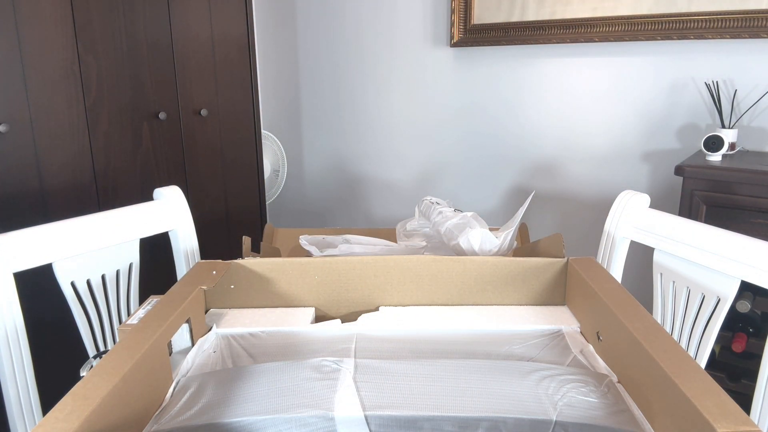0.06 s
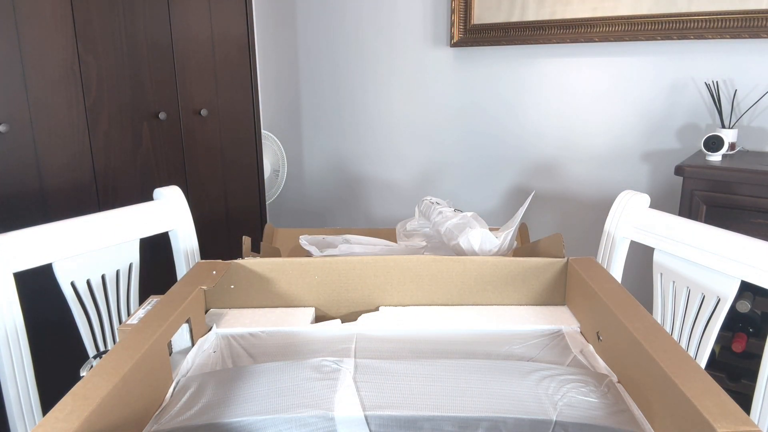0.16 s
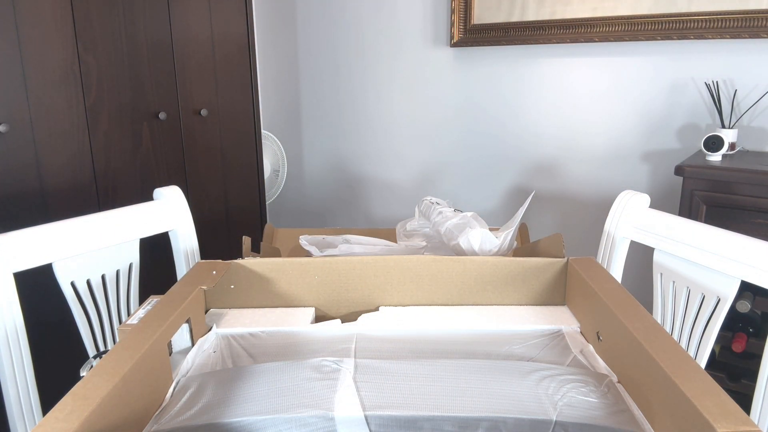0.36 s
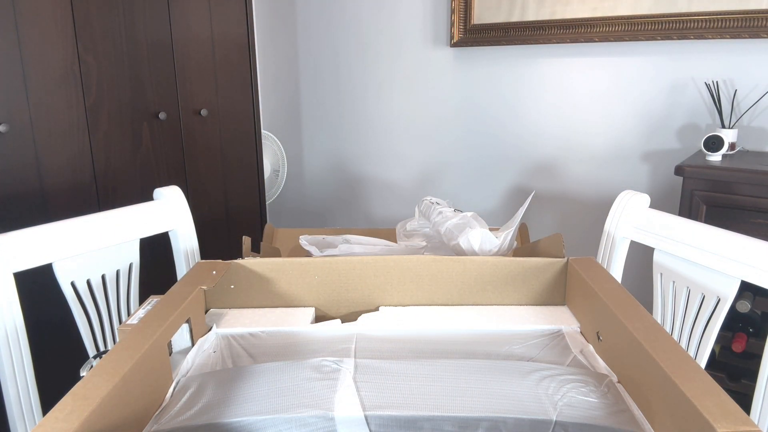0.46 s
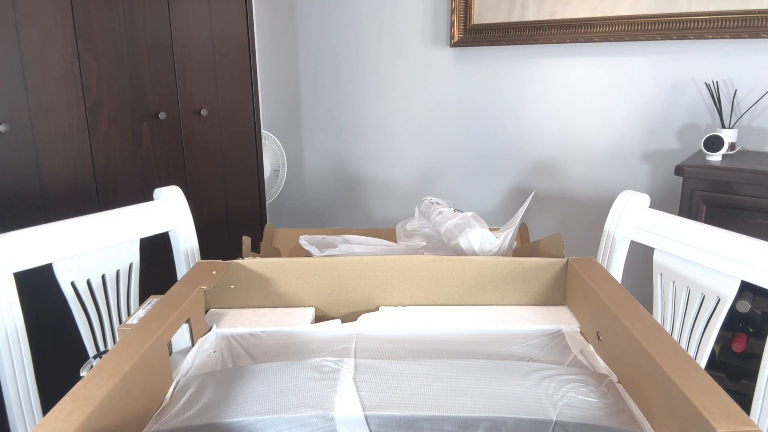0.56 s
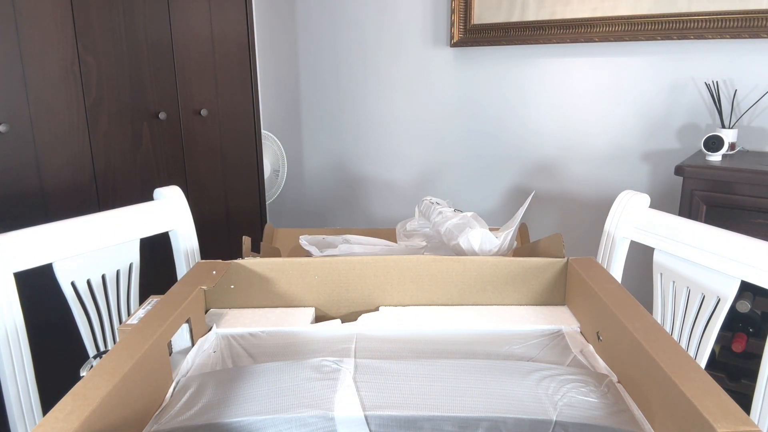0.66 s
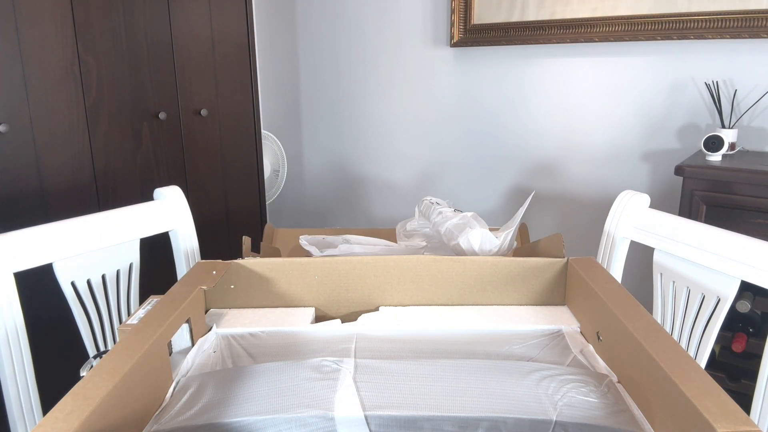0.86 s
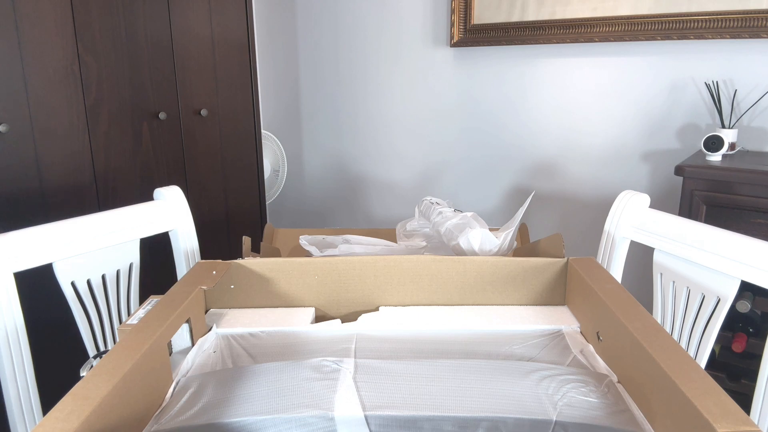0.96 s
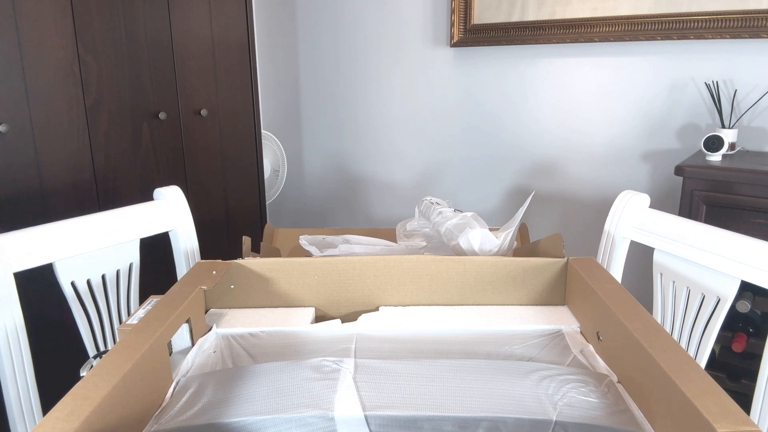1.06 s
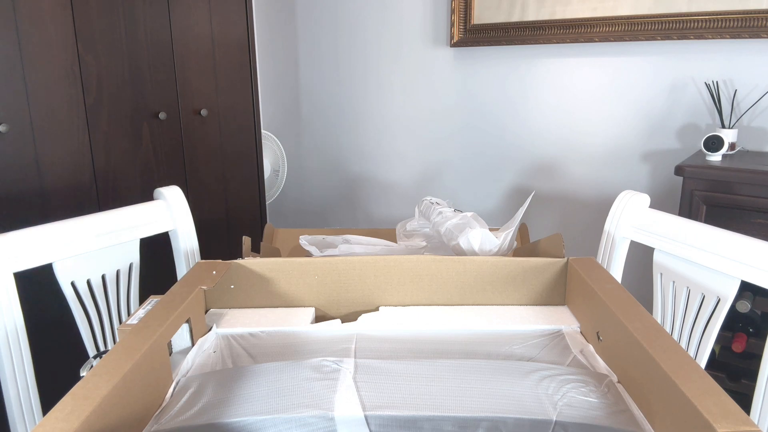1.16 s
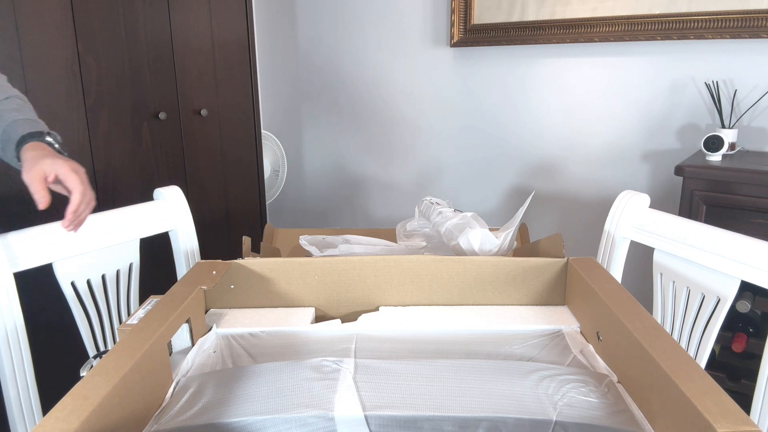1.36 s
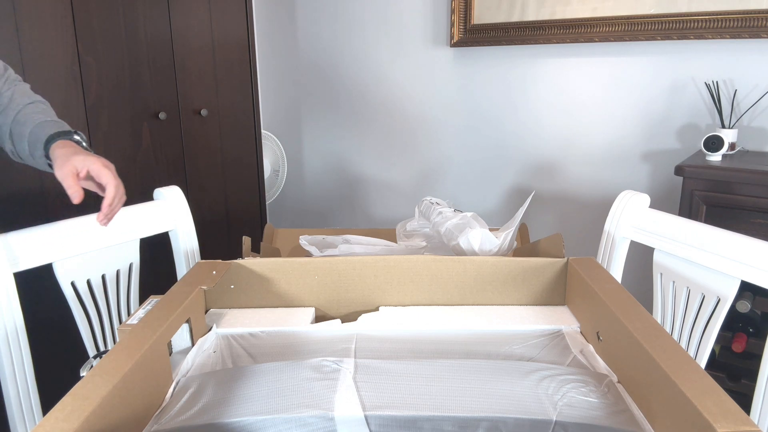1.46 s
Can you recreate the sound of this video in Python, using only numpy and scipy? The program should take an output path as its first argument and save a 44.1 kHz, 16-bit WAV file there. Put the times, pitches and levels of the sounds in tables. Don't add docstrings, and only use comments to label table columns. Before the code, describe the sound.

Foam packing is dragged out of a large cardboard box, close by in a furnished room. A faint hissing scuff and creak come at 0.05 s, then hard, hollow knocks tumble from 0.24 to 0.5 s, making the card panels boom and shudder. A lull follows until about 0.83 s, when softer dull bumps and light rubbing strokes resume, dying away by 1.5 s over faint low room hush.

```python
import sys
import numpy as np
from scipy import signal
from scipy.fft import rfft, irfft
from scipy.io import wavfile
from scipy.ndimage import uniform_filter1d

SR = 44100
rng = np.random.default_rng(int(sys.argv[2]) if len(sys.argv) > 2 else 0)


def output_pcm(signal):
    pcm = np.clip(np.atleast_2d(signal).T, -1, 1) * 32767
    wavfile.write(sys.argv[1], SR, np.round(pcm).astype(np.int16))


def rack_gain(trim_db):
    fader = np.asarray(trim_db, float)
    return 10 ** (fader / 20)


N = 66150

# start in seconds, level in dB, contact in ms, big-panel share in dB.
BUMPS = [(.178, -39, 0.6, -30), (0.2381, -17, 0.27, -12), (.241, -19, 0.33, -18), (.244, -17, 0.38, -9.5),
         (0.254, -13.5, 0.78, -11.5), (.281, -25, 0.9, 0), (0.294, -52, 2.2, -2), (.318, -21.5, 1.05, -11),
         (.385, -14, 0.74, -9.5), (.397, -20, 0.83, -22), (.404, -18.5, 0.85, -30), (.416, -16.5, 1.42, -4),
         (.428, -13.5, 0.75, -11), (.436, -18.5, 0.46, -12.5), (0.444, -50, 1.06, -2),
         (.465, -29.5, 0.95, -4), (0.499, -19.5, 1.57, -29), (0.561, -55, 3.7, 11), (0.59, -50, 5.1, 8),
         (0.689, -75, 2, -4), (.834, -33.5, 0.95, -11), (0.878, -52, 1.94, -6), (0.931, -32.5, 1.45, 0.5),
         (0.977, -32, 2.6, -1), (1.034, -40, 2.9, -6), (1.084, -40, 2.4, -17), (1.165, -44, 1.4, -3),
         (1.2, -32.5, 2.1, -1), (1.239, -35, 1.7, -1.5), (1.272, -36.5, 1.33, -3),
         (1.375, -48.5, 0.75, 1.5), (1.476, -51.5, 1.6, 6)]
# frequency in Hz, level in dB, T60 in seconds.
PANEL_MODES = [(51.5, -11.5, 0.16), (79.7, -8.5, 0.51), (104, -2, 0.1), (137, 4, 0.11), (197, 3, 0.11),
               (223.6, 0, 0.13)]
# frequency in Hz, level in dB, T60 in seconds.
WALL_MODES = [(279, -3, 0.064), (313.6, 2.5, 0.076), (336.5, 0.5, 0.071), (423.8, -3, 0.097),
              (451, -6, 0.1), (531, -1.5, 0.074), (637, -2, 0.03), (700, 0, 0.035), (741.5, -9.5, 0.088),
              (812, 0.5, 0.037), (905, -6.5, 0.048), (963, -8.5, 0.071), (1104, -8.5, 0.056),
              (1220, -42, 0.027)]
# start in seconds, pitch in Hz, level in dB, hold in seconds, T60 in seconds.
SHUDDERS = [(.24, 145.4, -20, 0.018, .07), (.255, 99, -21.5, 0.023, .1), (.297, 105, -27.5, 0.029, 0.049),
            (.342, 108, -30, 0.031, 0.035), (.386, 330, -28, 0.015, 0.11), (.411, 108, -22.5, 0.039, 0.32),
            (0.437, 337, -27, 0.078, .07), (.40, 452, -29, 0.063, 0.16), (.575, 228, -40.5, 0.035, 0.078),
            (.93, 106.8, -31.5, 0.0855, 0.071), (1.024, 108, -40, 0.046, .06),
            (1.196, 178, -34, 0.013, 0.07), (1.278, 97, -39, .03, 0.17), (1.205, 310, -46.5, 0.082, 0.086),
            (.92, 53.7, -48.5, 0.13, 0.23), (.44, 96, -40, 0.15, 0.19), (.25, 338, -31, 0.043, 0.078),
            (.243, 952, -26, 0.016, 0.051), (1.08, 108, -38, 0.015, 0.19), (1, 112, -43, 0.047, .06),
            (1.04, 312, -50, 0.048, 0.055), (1.26, 139, -43, 0.037, 0.08), (1.36, 85, -49.5, 0.02, 0.068),
            (0.35, 950, -48, .02, 0.075), (.31, 510, -39, 0.018, .07), (0.47, 51.5, -52, .03, .1),
            (1.195, 67, -42, .02, .1), (.43, 680, -35.5, 0.026, 0.098), (.27, 600, -33, 0.022, 0.056),
            (.44, 530, -36, 0.059, 0.13), (1.1, 195, -47, 0.027, 0.072), (1.475, 105, -60, 0.013, .08)]
# time in seconds, level in dB, creak over hiss in dB, fine top of the hiss in dB.
RUBBING = [(0, -74.5, 3, -3.5), (0.05, -44.5, -0.5, -2), (0.093, -53.5, 2.5, 0.5), (0.163, -64, 4.5, -4.5),
           (0.209, -52.5, 9, -3.5), (.246, -56, 4, -1.5), (.34, -54, 6.5, -1), (0.384, -52, 6, 4),
           (0.523, -54, 3, 3), (0.642, -78, 0, 6.5), (0.809, -57.5, -3.5, -2), (0.914, -75, -19, -1),
           (0.951, -69, 11.5, 3.5), (0.99, -58.5, 5, 9), (1.14, -64.5, 0.5, 0.5), (1.18, -59.5, 6.5, 3),
           (1.321, -69, 7, -1), (1.5, -78, -17, 11)]
# frequency in Hz, level in dB.
HISS_SPECTRUM = [(600, -67), (1300, 5), (3500, 3), (8400, -7.5), (11000, -0.5), (13300, -5), (14200, -1),
                 (15700, -16)]
# frequency in Hz, bandwidth in Hz, level in dB.
CREAK_MODES = [(357, 120, -10.5), (614, 107, -1), (833, 99, -1.5), (1128, 83, 1.5), (1920, 760, -12),
               (2655, 84, -17), (3520, 810, -48)]
# length in seconds, level in dB, centre in Hz, scuff level in dB.
SHOVES = [(0.058, -51, 2820, -64.5), (0.05, -41, 737, -58), (0.011, -31, 915, -51),
          (0.0073, -26.5, 496, -81), (0.032, -47, 470, -72.5), (0.021, -51, 590, -58.5),
          (0.047, -52, 790, -59.5), (0.048, -55, 810, -69.5), (0.036, -55, 1080, -72),
          (0.005, -56, 8600, -70), (0.074, -59, 730, -102)]
SHOVE_STARTS = [.038, .177, .239, .385, .833, .929, 1.153, 1.23, .095, .425, 1.0]
# frequency in Hz, correlation from 0 to 1.
COHERENCE = [(60, 0.95), (150, 0.7), (300, 0.21), (700, 0.22), (2500, 0), (6500, 0.033), (9300, 0.82),
             (12000, 0.78)]
# frequency in Hz, lead of the left channel in radians.
CHANNEL_PHASE = [(0, 0), (4650, 10.4), (7400, 12.6), (9850, 15.9), (11700, 18.5), (13100, 19.3), (14500, 22.0),
                 (15700, 23.2)]
# frequency in Hz, level in dB.
LEFT_LEVEL = [(100, -2), (300, -2), (700, 0.5), (3000, -3.14), (8000, -0.5)]
# frequency in Hz, T60 in seconds.
ROOM_T60 = [(60, 0.93), (300, 0.41), (1000, 0.33), (4000, 0.23), (12000, 0.26)]
# frequency in Hz, level in dB.
HUSH_SPECTRUM = [(18, -36), (35, -4), (90, -13), (200, -14), (1000, -23.5), (3000, -32), (8400, -44.5),
                 (15700, -42)]


def read(table, hz):
    table = np.array(table)
    return np.interp(np.log(np.maximum(hz, 1)), np.log(table[:, 0]), table[:, 1])


def unit(x):
    return x / np.sqrt(np.mean(x ** 2))


def colour(x, table):
    hz = np.arange(N // 2 + 1) * SR / N
    return irfft(rfft(x) * rack_gain(read(table, hz)), N)


def ring(x, hz, width_hz):
    radius = np.exp(-np.pi * width_hz / SR)
    angle = 2 * np.pi * hz / SR
    return signal.lfilter([0, np.sin(angle) * radius], [1, -2 * radius * np.cos(angle), radius ** 2], x)


def modes(x, table):
    out = np.zeros(N)
    for k, (hz, db, t60) in enumerate(table):
        width_hz = np.log(1000) / np.pi / t60
        out += (-1) ** k * rack_gain(db) * ring(x, hz, width_hz)
    return out


def walk(rate):
    hold = int(SR / rate)
    steps = np.repeat(rng.standard_normal(N // hold + 1), hold)
    return unit(uniform_filter1d(steps, hold)[:N])


def slips(rate, scatter_db):
    chance, sign, size = rng.random((3, N))
    return (chance < rate / SR) * np.sign(sign - .5) * rack_gain(-scatter_db * np.log(1 - size))


def box():
    rattle_s, rattle_per_s, rattle_db = 0.018, 600, -5
    chatter = unit(slips(rattle_per_s, 3.0)) / 8
    to_panels, to_walls = np.zeros(N), np.zeros(N)
    for start, db, contact_ms, panel_db in BUMPS:
        i = int(start * SR)
        n = min(4410, N - i)
        t = np.arange(n) / SR
        hits = rack_gain(rattle_db) * chatter[i:i + n] * np.exp(-t / rattle_s) / 4
        hits[0] += 1
        phase = np.arange(441) / SR / (contact_ms / 1000)
        push = np.sin(np.pi * np.minimum(phase, 1)) ** 2
        blow = rack_gain(db) * np.convolve(hits, push / push.sum())[:n]
        to_walls[i:i + n] += blow
        to_panels[i:i + n] += blow * rack_gain(panel_db)
    slap = rack_gain(14) * ring(to_walls, 520, 500)
    return 0.41 * (modes(to_panels, PANEL_MODES) + modes(to_walls, WALL_MODES) + slap)


def shudders():
    rise_s, wobble_db, drift = .008, 1.0, .008
    t, out = np.arange(N) / SR, np.zeros(N)
    for start, hz, db, held, t60 in SHUDDERS:
        swell = np.sin(np.pi / 2 * np.clip((t - start) / rise_s, 0, 1))
        decay = rack_gain(-60 * np.maximum(t - start - held, 0) / t60)
        turns = np.cumsum(hz * (1 + drift * walk(29.54))) / SR
        hum = np.sin(2 * np.pi * (turns - turns[int(start * SR)]))
        out += rack_gain(db + wobble_db * walk(41.3)) * swell * decay * hum
    return out


def rubbing_hiss():
    grit_share, grit_per_s, grit_scatter_db = .35, 900, 3.5
    grit = unit(slips(grit_per_s, grit_scatter_db))
    return unit(colour(rng.standard_normal(N) + grit_share * grit, HISS_SPECTRUM))


def card_creak():
    grip = slips(930, 1)
    out = np.zeros(N)
    for k, (hz, width_hz, db) in enumerate(CREAK_MODES):
        out += (-1) ** k * rack_gain(db) * unit(ring(grip, hz, width_hz))
    return unit(out)


def shoves(hiss):
    rise_s, fade_s, width_share = .002, .018, .8
    t, out = np.arange(N) / SR, np.zeros(N)
    for start, (length, db, hz, scuff_db) in zip(SHOVE_STARTS, SHOVES):
        rise = np.clip((t - start) / rise_s, 0, 1)
        fade = np.exp(-np.maximum(t - start - length, 0) / fade_s)
        width_hz = width_share * hz
        grind = unit(ring(ring(slips(1400, 2.24), hz, width_hz), hz, width_hz))
        out += rise * fade * (rack_gain(db) * grind + rack_gain(scuff_db) * hiss)
    return out


def foam():
    flicker_db, fine_hz = 1.5, 5170
    t = np.arange(N) / SR
    times, effort_db, creak_db, fine_db = np.array(RUBBING).T
    effort = np.interp(t, times, effort_db)
    hiss = rubbing_hiss()
    fine = signal.sosfiltfilt(signal.butter(2, fine_hz, "high", fs=SR, output="sos"), hiss)
    coarse = (hiss - fine) * rack_gain(flicker_db * walk(90))
    fine = fine * rack_gain(np.interp(t, times, fine_db) + flicker_db * walk(90))
    hiss = coarse + fine
    creak_level = effort + np.interp(t, times, creak_db) + 2.0 * walk(50)
    return hiss * rack_gain(effort) + card_creak() * rack_gain(creak_level) + shoves(hiss)


def pair(a, b):
    n = a.shape[-1]
    hz = np.arange(n // 2 + 1) * SR / n
    alike = np.clip(read(COHERENCE, hz), 0, 1)
    mid = rfft(a) * np.sqrt((1 + alike) / 2)
    side = rfft(b) * np.sqrt((1 - alike) / 2)
    lead = np.exp(1j * np.interp(hz, *np.array(CHANNEL_PHASE).T))
    left = (mid + side) * rack_gain(read(LEFT_LEVEL, hz)) * lead
    return irfft(np.array([left, mid - side]), n)


def room(x, wet_db, t60_share=1):
    onset_s, bass_cut_hz = 0.0015, 183
    t = np.arange(32768) / SR
    tail = np.zeros((2, len(t)))
    for hz in 45 * 2 ** np.arange(0, 9.0):
        edges = [hz / 2 ** .5, min(hz * 2 ** .5, .45 * SR)]
        band = signal.butter(2, edges, "band", fs=SR, output="sos")
        t60 = t60_share * read(ROOM_T60, hz)
        noise = signal.sosfilt(band, rng.standard_normal(tail.shape))
        tail += noise * rack_gain(-60 * t / t60) / np.sqrt(t60 * SR / 13.8)
    tail = signal.lfilter(*signal.butter(1, bass_cut_hz, "high", fs=SR), tail)
    tail *= rack_gain(wet_db) * (1 - np.exp(-(t / onset_s) ** 2))
    tail[0, 64] += 1
    return signal.fftconvolve(x[None], pair(*tail), axes=1)[:, 64:N + 64]


def hush():
    duck_db, duck_s, duck_width_s = -3, 0.68, 0.058
    noise = pair(*(unit(colour(rng.standard_normal(N), HUSH_SPECTRUM)) for _ in range(2)))
    ducked = duck_db * np.exp(-((np.arange(N) / SR - duck_s) / duck_width_s) ** 2)
    return noise * rack_gain(ducked - 57.5 + 1.66 * walk(3.94))


def scene():
    bumps = room(box(), -0.5)
    hums = room(shudders(), -8.5)
    rubs = room(foam(), 1, t60_share=.4)
    return bumps + hums + rubs + hush()


def band_limit(x):
    return signal.sosfilt(signal.butter(12, 15890, fs=SR, output="sos"), x)


def record(dry):
    bass_cut = signal.butter(4, 45, "high", fs=SR, output="sos")
    top_cut = signal.ellip(8, .5, 80, 15850, fs=SR, output="sos")
    mix = signal.sosfilt(top_cut, signal.sosfilt(bass_cut, dry))
    return band_limit(mix)


dry = scene()
out = record(dry)
output_pcm(out)
```